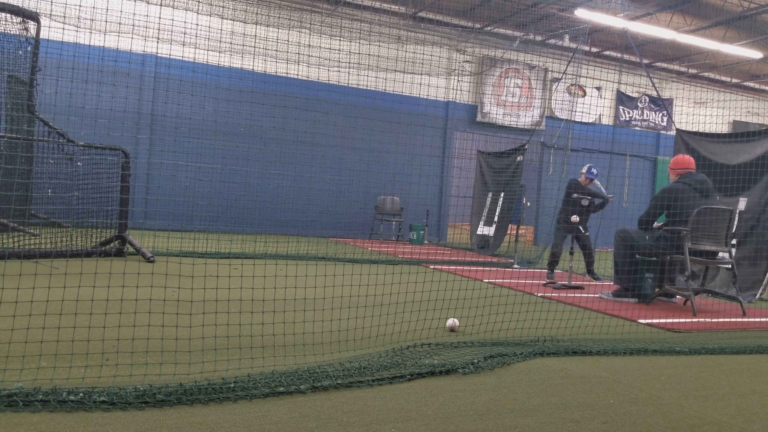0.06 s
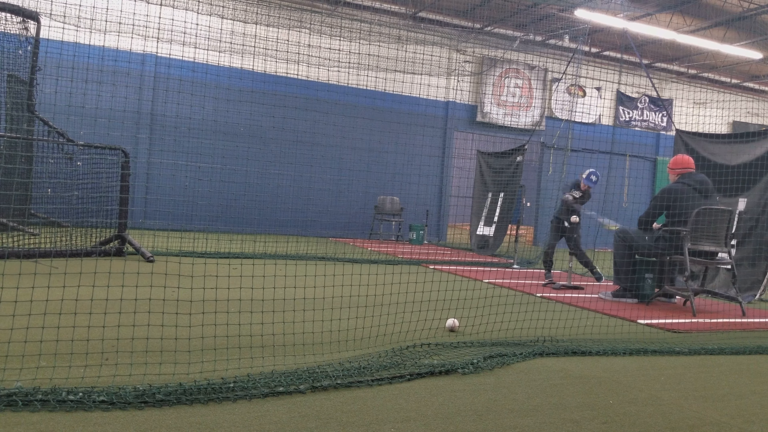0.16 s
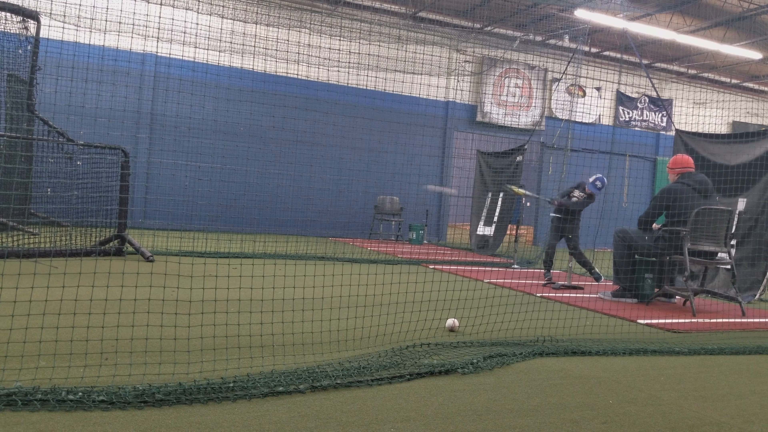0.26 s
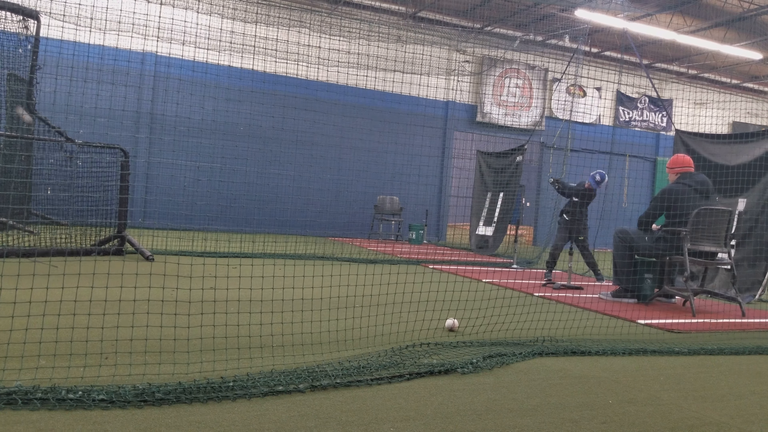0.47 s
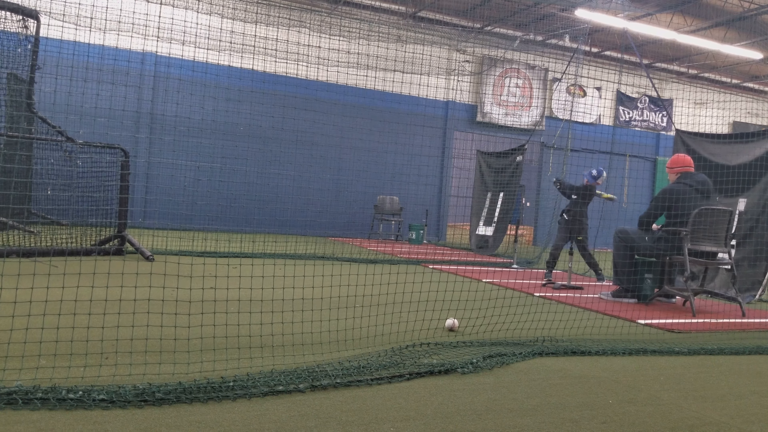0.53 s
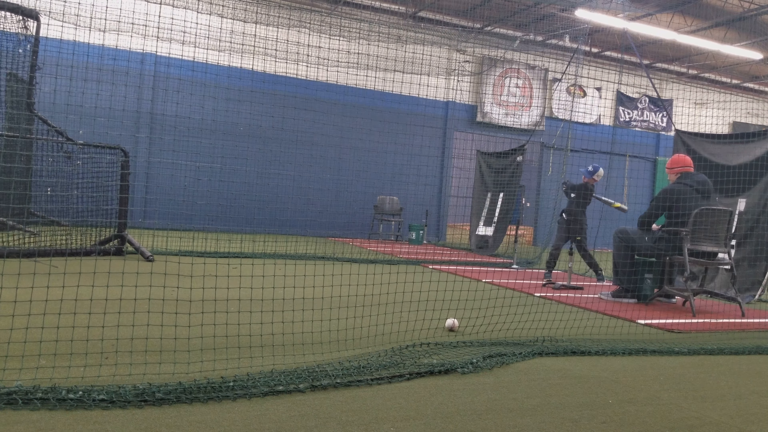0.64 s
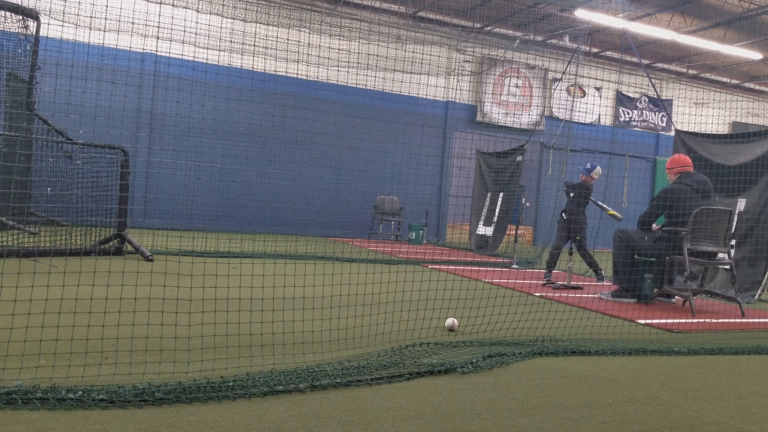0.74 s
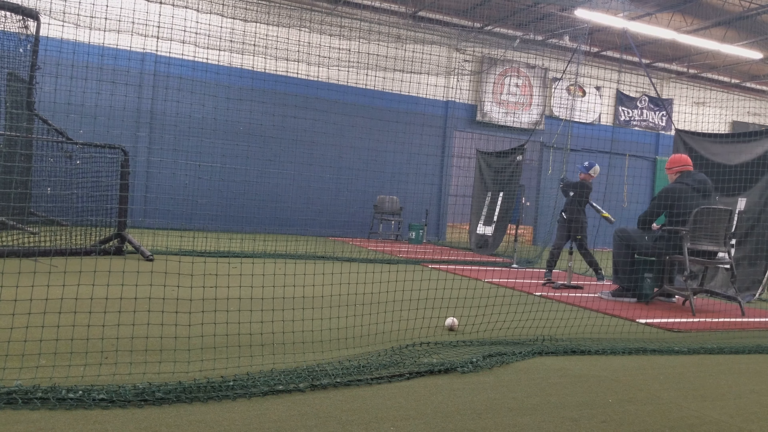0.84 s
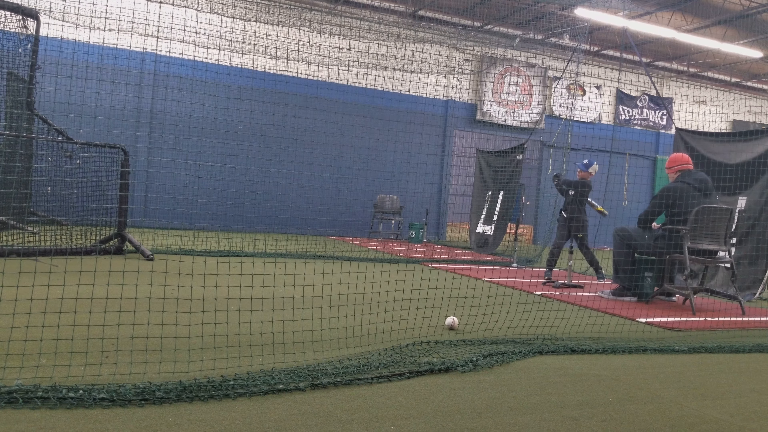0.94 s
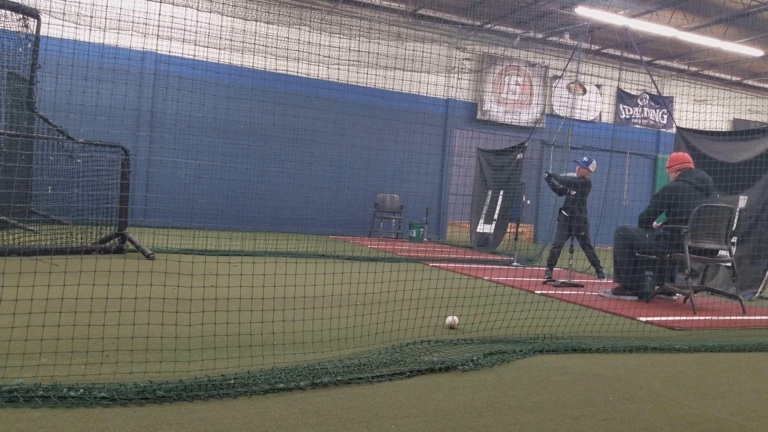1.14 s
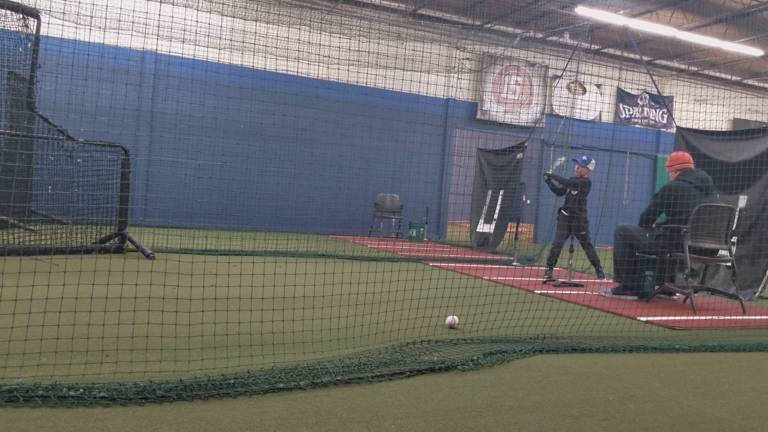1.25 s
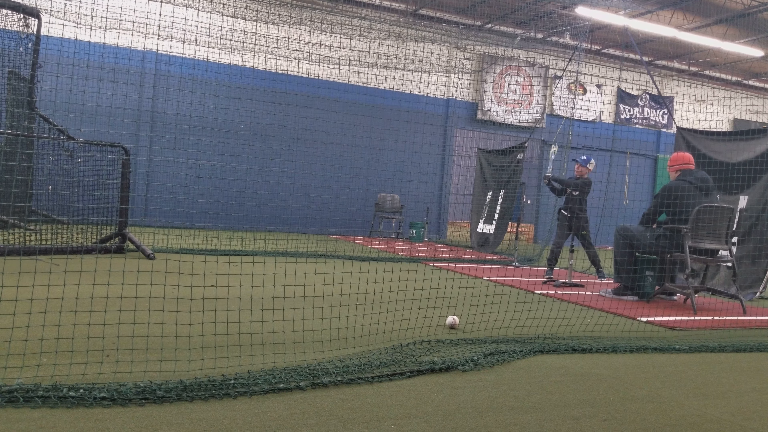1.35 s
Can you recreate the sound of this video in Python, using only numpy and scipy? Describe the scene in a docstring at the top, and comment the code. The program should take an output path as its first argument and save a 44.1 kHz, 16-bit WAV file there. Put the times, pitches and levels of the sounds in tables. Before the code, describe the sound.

A bat cracks a ball in an indoor batting cage. The ball then clangs loudly on steel, which rings on, and a soft, distant thud follows. Each impact echoes through the large hall over a low ventilation rumble.

```python
"""A bat cracks a ball in a large, hard-walled indoor batting cage; the walls slap the blow back.
A quarter of a second later the ball clangs on metal, probably the cage's steel frame, whose modes
ring on. A soft thud follows, probably the ball dropping on the turf. Each impact reverberates in
the hall, over the rumble and hum of ventilation and the fading wash of earlier activity."""
import sys
import numpy as np
from scipy import signal
from scipy.fft import rfft, irfft
from scipy.io import wavfile

SR = 44100
rng = np.random.default_rng(int(sys.argv[2]) if len(sys.argv) > 2 else 0)


def to_wav(s):
    """Save 16-bit WAV."""
    ch = np.atleast_2d(s).T  # columns
    pcm = np.round(np.clip(ch, -1, 1) * 32767)  # PCM
    wavfile.write(sys.argv[1], SR, pcm.astype(np.int16))


N = 61739
T, HZ = np.arange(N) / SR, np.fft.rfftfreq(N, 1 / SR)
BAT_S, CLANG_S, THUD_S = .2306, .5086, .805

# Diffuse sound at the two ears. Each row: frequency in Hz, correlation from -1 to 1.
EAR_COHERENCE = [(20, 0.94), (70, 0.95), (150, 0.98), (300, 0.88), (600, .65), (1200, -0.23),
                 (2400, -0.033), (5000, 0), (15000, 0)]
# Microphone balance in diffuse sound. Each row: frequency in Hz, left minus right in dB.
MIC_BALANCE = [(100, 0), (700, 1), (1300, -0.5), (2400, -5), (4200, 2), (8000, 1.5), (15000, -1.5)]
# Ventilation rumble. Each row: frequency in Hz, relative level in dB.
RUMBLE_SPECTRUM = [(20, -25), (45, -8.5), (75, 5.5), (95, -1.5), (130, -2.5), (180, 2), (260, 4), (400, -5),
                   (700, -5.5), (1400, -18), (2500, -15.5), (4500, -32), (9000, -49), (16000, -51)]
# Fan and mains hum. Each row: frequency in Hz, rms level in dB.
HUM_TONES = [(74.5, -48.5), (120, -48), (238, -50)]
# Reverberation of earlier activity. Each row: frequency in Hz, relative level in dB.
WASH_SPECTRUM = [(60, -1), (130, 10.5), (300, 5), (500, -6), (1200, -3), (2500, -4.5), (4000, -25),
                 (7000, -32), (10000, -53), (16000, -49.5)]
# The crack straight from the bat. Each row: frequency in Hz, relative level in dB.
CRACK_SPECTRUM = [(20, -39.5), (60, -26.5), (150, 3.5), (600, 8.5), (1200, 0.5), (2300, 6), (2900, -2.5),
                  (3500, -20.5), (5600, -20), (7800, -8), (9500, -30.5), (16000, -17.5)]
# The crack radiated into the hall. Each row: frequency in Hz, relative level in dB.
CRACK_HALL_SPECTRUM = [(20, -51.5), (60, -28.5), (100, -14), (160, -7), (300, -4.5), (380, -9.5), (620, 0),
                       (1000, -2), (1400, -4.5), (2500, -5), (3400, -15.5), (5000, -21), (7800, -25.5),
                       (9500, -36), (16000, -31.5)]
# Modes of bat and ball. Each row: frequency in Hz, relative level in dB, T60 in seconds.
BAT_BALL_MODES = [(664, -31, .1), (1010, -35, .05), (2060, -43, .04)]
# Wall echoes of the crack. Each row: delay in seconds, gain in dB, right-ear lag in seconds.
WALL_ECHOES = [(0.0122, -7.5, .0001), (.0158, -4.5, -.0002), (.019, -11.5, .0002), (.0365, -10.5, -.0001),
               (.0545, -23.5, .0002), (.0665, -11, .0001)]
# The bat's note off the walls. Each row: delay in seconds, level in dB, half width in seconds.
WALL_SWELLS = [(0.02, -12.5, 0.0034), (.065, -12, 0.0066)]
# The hall's reverberation time. Each row: frequency in Hz, T60 in seconds.
HALL_T60 = [(100, 1.2), (300, 1.47), (700, 1.55), (1500, 1.45), (2500, 1.065), (4200, 0.83), (6000, 0.52),
            (9000, 0.4), (15000, .34)]
# The blow on the steel. Each row: frequency in Hz, relative level in dB.
CLANG_SPECTRUM = [(20, -51.5), (100, -21), (250, -16.5), (450, -11.5), (700, -12), (1100, -9), (1350, -4.5),
                  (1750, -2.5), (2650, -1), (3100, -11), (3330, -5), (3550, -10.5), (3700, -3.5),
                  (3900, -8.5), (4250, -4.5), (4900, -11.5), (5500, -8), (7200, -11), (9400, -24),
                  (12000, -16), (16000, -28.5)]
# The steel's clear modes. Each row: frequency in Hz, level in dB, T60 in seconds.
STEEL_MODES = [(440, -32, .3), (1345, -31, 1.0), (1738, -24.5, 1.25), (1848, -26.5, 1.0), (2121, -25, .9),
               (2252, -27, .9), (2300, -27, .9), (2521, -15, .45), (2670, -29, .7), (2791, -23, .55),
               (3327, -27, .65), (3682, -28, .6), (4183, -27, .8), (4222, -28, .8), (4433, -27, .65),
               (7080, -17, .12)]
# The clang off floor and wall. Each row: delay in seconds, gain in dB, right-ear lag in seconds.
CLANG_REFLECTIONS = [(.004, -9, -.0001), (.0485, -5, .0001)]
# The clang's lean to one side. Each row: frequency in Hz, left minus right in dB.
CLANG_BALANCE = [(700, -1), (1400, 0), (2400, -1), (4000, -0.5), (8000, 1.5)]
# The soft thud. Each row: frequency in Hz, relative level in dB.
THUD_SPECTRUM = [(20, -66), (120, -9), (250, -22), (550, 14), (750, 16.5), (1100, -32), (3000, -14),
                 (16000, -60)]


def amp(db):
    """Amplitude grows tenfold for every 20 dB."""
    return 10 ** (np.asarray(db) / 20)


def curve(table, hz):
    """Interpolation on a logarithmic frequency axis."""
    frequencies, values = np.transpose(table)
    return np.interp(np.log(hz + 1), np.log(frequencies + 1), values)


def unit(x):
    """Normalisation to a mean energy of 1 per channel."""
    return x / np.sqrt(np.mean(np.sum(x ** 2, -1)) + 1e-20)


def fade(t60):
    """Damping: an exponential fall of 60 dB in t60 seconds."""
    return np.exp(-np.log(1000) * T / t60)


def delay(x, seconds):
    """A time shift by whole samples."""
    n = np.arange(N)
    source = n - np.round(seconds * SR)
    return np.apply_along_axis(lambda channel: np.interp(source, n, channel, left=0, right=0), -1, x)


def through(x, response):
    """A linear system convolves its input with its impulse response."""
    return signal.fftconvolve(np.atleast_2d(x), np.atleast_2d(response), axes=1)[:, :N]


def ears(x, lag_s, left_db=0):
    """Interaural differences of time and level give a sound its direction."""
    return np.array([x * amp(left_db / 2), delay(x, lag_s) * amp(-left_db / 2)])


def diffuse():
    """A diffuse noise field is coherent at two close microphones only at long wavelengths."""
    a, b = rfft(rng.standard_normal((2, N)))
    coherence = np.clip(curve(EAR_COHERENCE, HZ), -1, 1)
    tilt = amp(curve(MIC_BALANCE, HZ) / 2)
    mid, side = a * np.sqrt((1 + coherence) / 2), b * np.sqrt((1 - coherence) / 2)
    return irfft(np.array([(mid + side) * tilt, (mid - side) / tilt]), N)


def coloured_noise(spectrum):
    """Spectral shaping of a steady diffuse field, rms 1."""
    noise = irfft(rfft(diffuse()) * amp(curve(spectrum, HZ)), N)
    return noise / noise.std()


def drift(rate_hz):
    """Low-passed noise is a slow random fluctuation, rms 1."""
    noise = irfft(rfft(rng.standard_normal(N)) * np.exp(-(HZ / rate_hz) ** 2) * (HZ > 0), N)
    return noise / noise.std()


def ventilation(waver_hz=.5, waver_share=.25):
    """Broadband rumble underlies fan and mains tones, randomly modulated in amplitude and pitch."""
    hum = 0
    for hz, db in HUM_TONES:
        level = amp(db) * np.sqrt(2) * (1 + waver_share * drift(6))
        cycles = rng.random() + np.cumsum(hz + waver_hz * drift(5)) / SR
        hum += level * np.sin(2 * np.pi * cycles)
    return amp(-41) * coloured_noise(RUMBLE_SPECTRUM) + hum


def wash(fade_db_per_s=2.5):
    """Reverberant energy left by earlier activity decays exponentially."""
    return amp(-43.5 - fade_db_per_s * T) * coloured_noise(WASH_SPECTRUM)


def impact(spectrum):
    """A blow is a minimum-phase pulse: its energy, 1, comes as early as its spectrum allows."""
    log_gain = np.log(amp(curve(spectrum, abs(np.fft.fftfreq(N, 1 / SR)))))
    response = np.exp(np.conj(signal.hilbert(log_gain)))
    return unit(np.fft.ifft(response).real)


def ring(modes):
    """Free vibration is a sum of damped sinusoids, one for each mode."""
    return sum(amp(db) * fade(t60) * np.sin(2 * np.pi * hz * T) for hz, db, t60 in modes)


def bat_crack():
    """Impact excites bat and ball; scatter off nearby things and reflections follow the direct sound."""
    body = ring(BAT_BALL_MODES)
    crack = -amp(8) * (impact(CRACK_SPECTRUM) + amp(-6) * body)
    direct = ears(crack, lag_s=.00005, left_db=4.5)
    scatter = amp(-2) * through(crack, unit(diffuse() * fade(t60=.028)))
    radiated = unit(impact(CRACK_HALL_SPECTRUM) + amp(-4.5) * body)
    reverb = amp(16) * through(radiated, hall(early_db=-1))
    return direct + scatter + echoes(crack, WALL_ECHOES) + wall_swells() + reverb


def hall(early_db, gap_s=.0079, build_s=.004, hold_s=.09, early_t60_s=.3):
    """Reverberation: dense early reflections hold briefly, then yield to a darkening tail."""
    hz, t, spectra = signal.stft(diffuse(), SR, nperseg=256)
    decay = amp(-60 * t / curve(HALL_T60, hz)[:, None])
    tail = signal.istft(spectra * decay, SR, nperseg=256)[1][:, :N]
    onset = np.clip((T - gap_s) / build_s, 0, 1)
    early = amp(early_db - 60 * np.maximum(T - hold_s, 0) / early_t60_s)
    return unit(tail * onset * np.sqrt(1 + early ** 2))


def echoes(x, reflections, cutoff_hz=2213):
    """Each specular reflection is a delayed, weaker and duller copy of the sound."""
    dull = signal.lfilter(*signal.butter(1, cutoff_hz, fs=SR), x)
    return sum(amp(db) * delay(ears(dull, lag), s) for s, db, lag in reflections)


def wall_swells():
    """Reflection from the walls returns the bat's lowest mode in rounded swells."""
    level = sum(amp(db) * np.exp(-((T - s) / width) ** 2) for s, db, width in WALL_SWELLS)
    return level * np.sin(2 * np.pi * BAT_BALL_MODES[0][0] * T)


def weak_modes(count=160, low_hz=1311.6, top_hz=15416):
    """The steel's many weaker modes lie at random pitches; damping rises with frequency."""
    jitter, phases = rng.random((count, 2)).T
    pitches = low_hz * (top_hz / low_hz) ** ((np.arange(count) + jitter) / count)
    t60s = .25 * np.sqrt(3000 / pitches)
    return unit(sum(np.sqrt(hz / t60) * fade(t60) * np.sin(2 * np.pi * (hz * T + phase))
                    for hz, t60, phase in zip(pitches, t60s, phases)))


def steel_clang():
    """The ball's impact excites resonances in the steel: a dense clatter and longer, clear tones."""
    blow = impact(CLANG_SPECTRUM)
    ringing = through(blow, amp(-5.5) * weak_modes())[0]
    clatter = through(blow, unit(diffuse() * fade(t60=.36)))
    direct = ears(amp(-11.5) * blow + amp(-3.5) * ringing, lag_s=.00005, left_db=10.5)
    reflected = echoes(amp(-10) * blow + clatter[0], CLANG_REFLECTIONS)
    near = amp(-5) * clatter + direct + reflected
    reverb = through(unit(blow + amp(-12) * ringing), hall(early_db=-2.5))
    clear_tones = ears(ring(STEEL_MODES), lag_s=.000025)
    clang = amp(17.5) * near + amp(23.5) * reverb + clear_tones
    lean = amp(curve(CLANG_BALANCE, HZ) / 2)
    return irfft(rfft(clang) * np.array([lean, 1 / lean]), N)


def thud(rise_s=.015):
    """A dull, distant impact arrives as diffuse sound, which blurs its attack."""
    envelope = np.minimum(T / rise_s, 1) * fade(t60=.16)
    spread = unit(diffuse() * envelope) + amp(-10) * hall(early_db=-1)
    return amp(-.5) * through(impact(THUD_SPECTRUM), spread)


def scene():
    """Superposition: three impacts in turn add to the hall's own noise."""
    impacts = delay(bat_crack(), BAT_S) + delay(steel_clang(), CLANG_S) + delay(thud(), THUD_S)
    return impacts + ventilation() + wash()


def record(dry):
    """Gain control ducks on the clang and keeps sinking slowly; soft clipping and a low-pass follow."""
    threshold_db, sense_s, sink_db_per_s = -12, .0067, .5
    ceiling, cutoff_hz = 1.05, 15950
    pole = np.exp(-1 / (sense_s * SR))
    power = signal.lfilter([1 - pole], [1, -pole], (dry ** 2).mean(0))
    excess_db = 10 * np.log10(power + 1e-12) - threshold_db
    sink_db = sink_db_per_s * T
    duck_db = np.maximum(np.maximum.accumulate(excess_db - sink_db) + sink_db, 0)
    rounded = ceiling * np.tanh(dry * amp(-duck_db) / ceiling)
    lowpass = signal.firwin(255, cutoff_hz, window=("kaiser", 9), fs=SR)
    return signal.oaconvolve(rounded, lowpass[None], "same")


dry = scene()
out = record(dry)
to_wav(out)
```